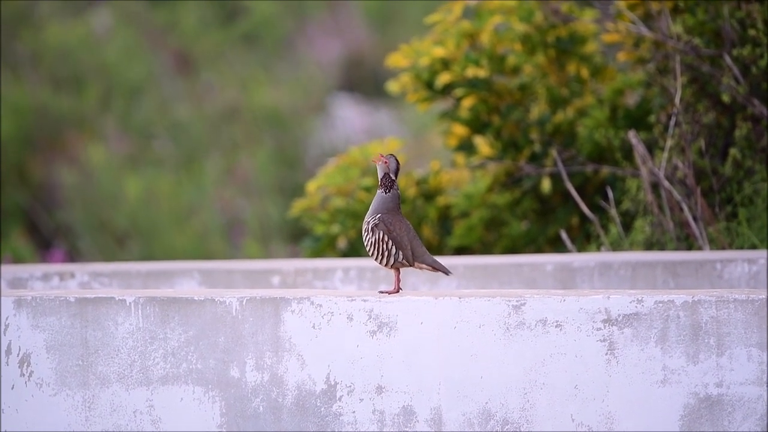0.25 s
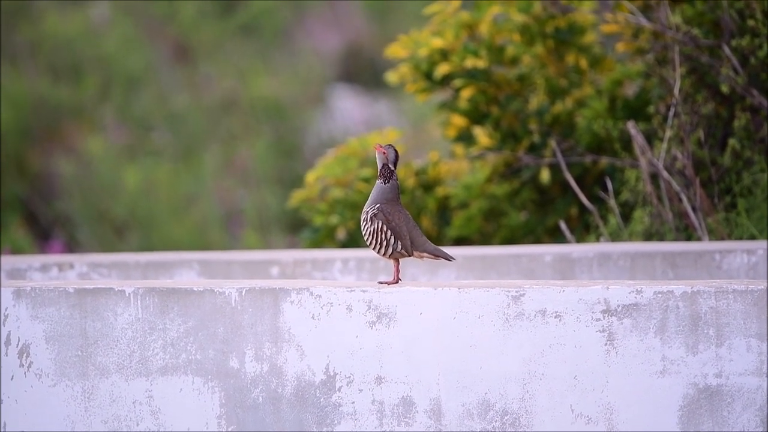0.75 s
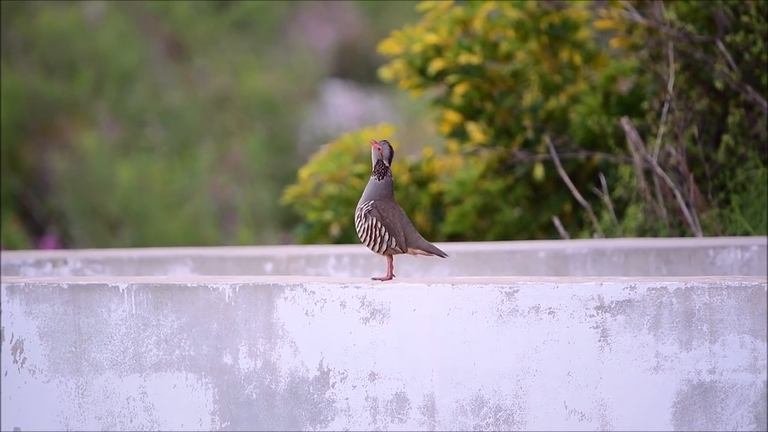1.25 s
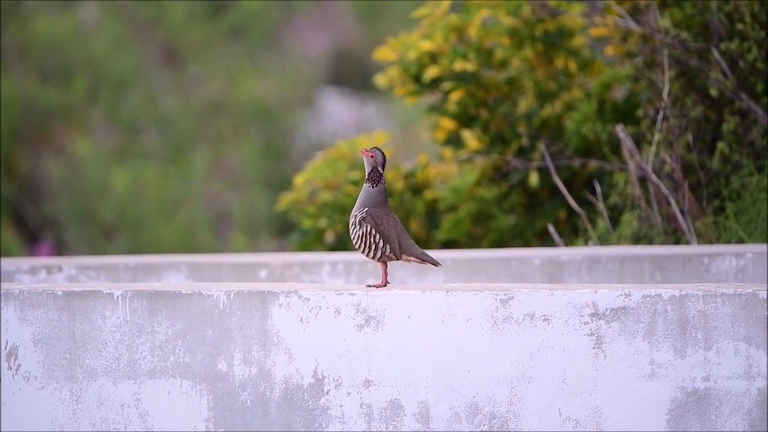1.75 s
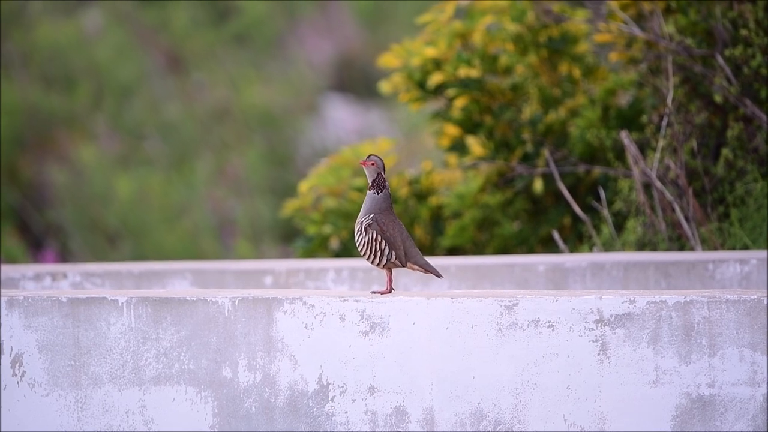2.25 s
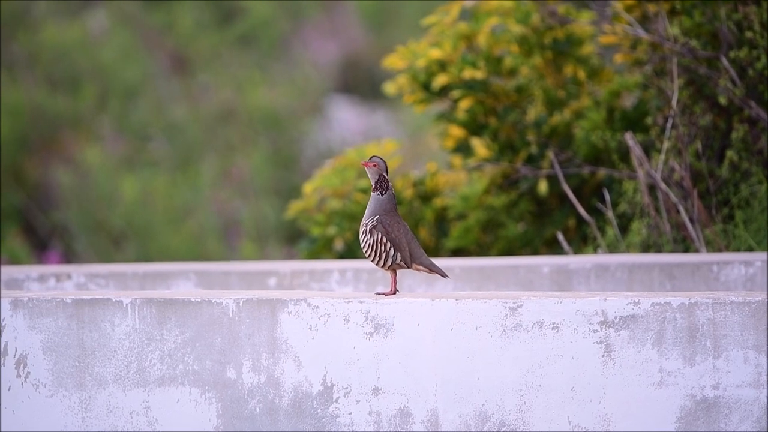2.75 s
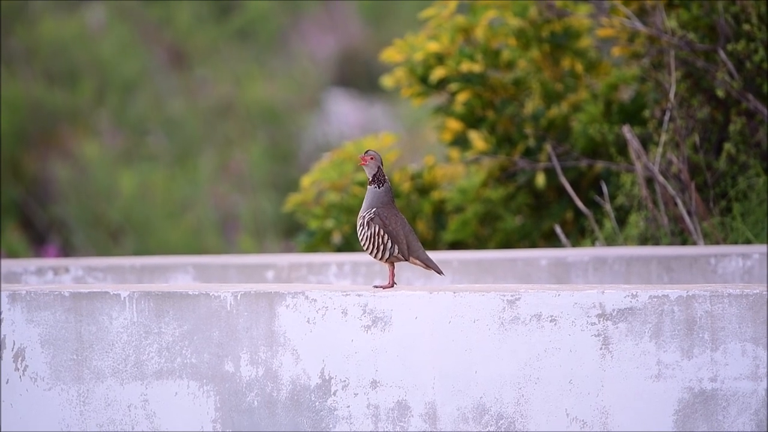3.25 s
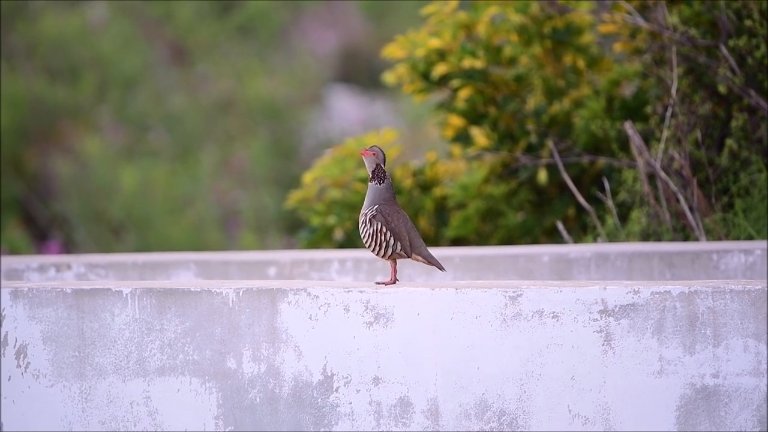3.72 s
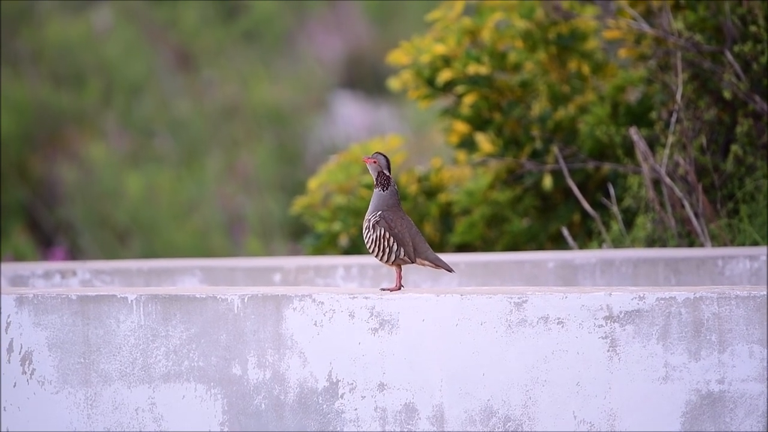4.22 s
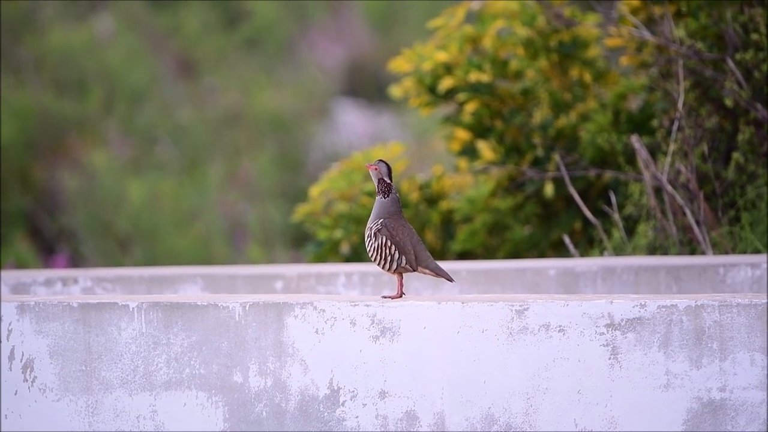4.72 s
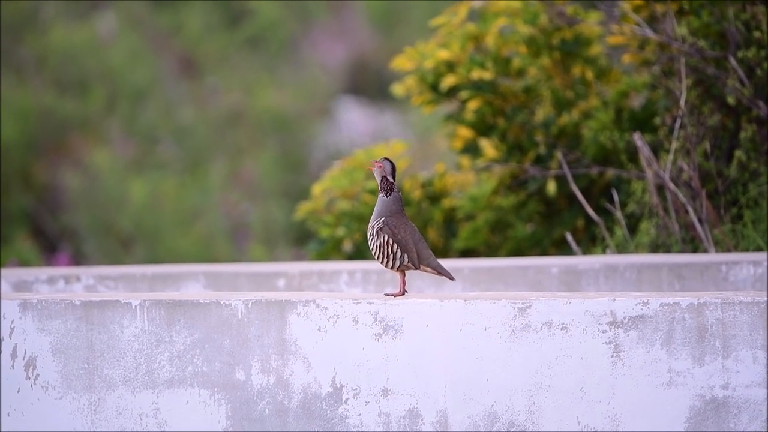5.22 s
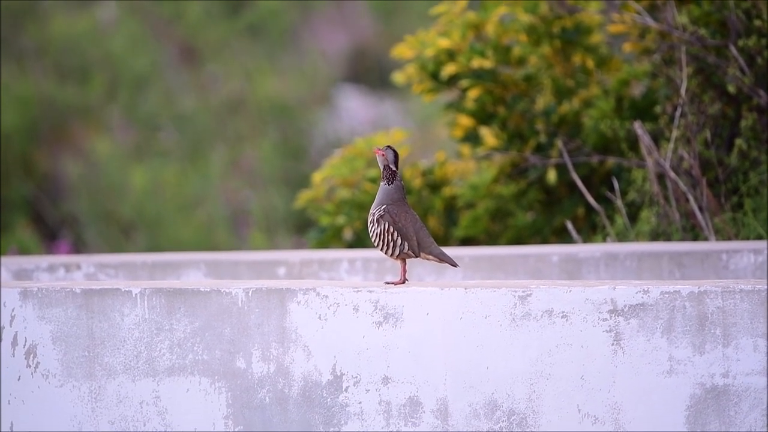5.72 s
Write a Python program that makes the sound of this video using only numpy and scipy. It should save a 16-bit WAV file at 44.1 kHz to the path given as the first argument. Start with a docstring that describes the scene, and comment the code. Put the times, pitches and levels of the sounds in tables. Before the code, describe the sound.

Pairs of high, raspy partridge calls repeat steadily on a hillside, with a low distant rumble and thin hum behind.

```python
"""Distant rumble, a camera's hum and its thin whine run throughout. A partridge's note echoes away
on a scrubby hillside and a harsh one follows. From 1 s the bird calls in pairs, squeaky then harsh:
each note opens with a croak, clears into an arched whistle, then breaks down into a rasping rattle.
Near 3.5 s the camera body knocks three times. The last pair gets a second harsh note at 5.3 s;
a final squeak comes at 5.9 s."""
import sys
import numpy as np
from scipy import signal
from scipy.fft import rfft, irfft, next_fast_len
from scipy.io import wavfile
from scipy.ndimage import map_coordinates

SR = 44100
rng = np.random.default_rng(int(sys.argv[2]) if len(sys.argv) > 2 else 0)


def materialize(psi):
    """Save the field psi as 16-bit PCM at rate SR to the path in sys.argv[1].

    A 1-D psi becomes a single channel; in a 2-D psi each row is a channel.
    """
    bounded = np.clip(np.atleast_2d(psi).T, -1, 1)
    quanta = np.round(bounded * 32767).astype(np.int16)
    wavfile.write(sys.argv[1], SR, quanta)


N = 263718


def amp(db):
    return 10 ** (np.asarray(db) / 20)


def unit(x):
    return x / np.sqrt(np.mean(x ** 2) + 1e-20)


def along(points, hz):
    """Interpolate (f/Hz, value) points over log frequency."""
    f, v = np.transpose(points)
    return np.interp(np.log(hz + 1), np.log(f), v)


def wobble(rate_hz, size):
    """Smooth random curve, rate_hz knots a second."""
    knots = rng.standard_normal(int(size * rate_hz / SR) + 4)
    return map_coordinates(knots, [np.arange(size) * rate_hz / SR])


def filtered(x, response):
    """Apply response(f/Hz) by FFT."""
    n = x.shape[-1]
    m = next_fast_len(n + 4096)
    return irfft(rfft(x, m) * response(np.fft.rfftfreq(m, 1 / SR)), m)[..., :n]


def resonance(f, hz, width_hz):
    """One damped mode."""
    return 1j * f * width_hz / (hz * hz - f * f + 1j * f * width_hz)


def step(t, rise_s):
    """Soft switch from 0 to 1 around t = 0."""
    return .5 + .5 * np.tanh(t / rise_s)


def add(track, sound, start_s):
    """Mix in a stereo sound."""
    i = round(start_s * SR)
    part = sound[:, max(-i, 0):N - i]
    track[:, max(i, 0):max(i, 0) + part.shape[1]] += part


def air():
    """Distant rumble, nearly mono, thinning to wide hiss in the treble."""
    # noise spectrum: f/Hz, relative density/dB
    spectrum = [(22, -16), (37, 1), (60, -3.5), (115, 0.5), (160, -2), (290, 0.5), (370, -6.5), (700, -3.5),
                (1100, -10.5), (1700, -16.5), (3000, -20.5), (6000, -28), (14000, -34.5), (16000, -20.5)]
    # left-right likeness: f/Hz, coherence
    coherence = [(50, 0.92), (150, 0.88), (400, 0.75), (1000, 0.41), (3000, 0.049), (12000, 0.062)]

    def mid_side(f):
        angle = np.arccos(np.clip(along(coherence, f), -1, 1)) / 2
        return amp(along(spectrum, f)) * [np.cos(angle), np.sin(angle)]

    mid, side = filtered(rng.standard_normal((2, N)), mid_side)
    return amp(-46 + .76 * wobble(2.206, N)) * unit(np.array([mid + side, mid - side]))


def hum():
    """The camera's mechanism hums through its body, mostly on the right, beside three steady tones."""
    # body modes: f/Hz, width/Hz, relative level/dB
    modes = [(288, 120, -24), (467.5, 13, -5.5), (689.7, 42, -3), (1068, 116, -8), (1329, 96, -3.5),
             (1456, 115, -4.5)]
    # steady tones: f/Hz, left/dB, right/dB
    tones = [(111.5, -60.5, -56.5), (886, -69, -69), (15635, -53, -59)]

    def body(f):
        power = sum(amp(2 * db) * abs(resonance(f, hz, width_hz)) ** 3 for hz, width_hz, db in modes)
        return np.sqrt(power / (1 + (f / 1560) ** 30))

    out = amp([[-64], [-43.5]]) * unit(filtered(rng.standard_normal(N), body))
    for hz, left_db, right_db in tones:
        phase = 2 * np.pi * np.cumsum(hz + 3 * wobble(25, N)) / SR
        out += np.sqrt(2) * amp([[left_db], [right_db]]) * np.sin(phase)
    return out


def knocks():
    """Small knocks ring the camera body's top mode; dry ticks go with them."""
    # body knocks: t/s, relative level/dB, t60/s
    hits = [(3.424, -29.5, 0.043), (3.4563, -21, 0.0082), (3.4922, -18, 0.023)]
    # dry ticks: t/s, level/dB
    ticks = [(3.425, -46), (3.4615, -46), (3.4812, -31)]
    out, t = np.zeros((2, N)), np.arange(SR // 16) / SR
    for start_s, db, t60_s in hits:
        ring = amp(db - 60 * t / t60_s) * (1 - np.exp(-t / .00074)) * np.sin(2 * np.pi * 1510 * t)
        add(out, ring * amp([[-10], [5]]), start_s)
    for start_s, db in ticks:
        noise = rng.standard_normal((2, len(t)))
        tick = filtered(noise, lambda f: resonance(f, 14000, 2200) - .6 * resonance(f, 5300, 1600))
        add(out, unit(tick) * amp(db - 60 * t / .008), start_s)
    return out


def hillside(voice):
    """Direct sound, quick scatter from ground and bushes, two far echoes and a diffuse tail."""
    # tail decay: f/Hz, t60/s
    decay = [(1000, 0.76), (2200, 0.94), (4200, 1.0), (6000, 0.88), (11000, 0.32)]
    hz, t, spectra = signal.stft(rng.standard_normal((3, SR)), SR, nperseg=256)
    tail = amp(-60 * t / along(decay, hz)[:, None]) * step(t - .03, .0071)
    scatter = amp(13.5 - 60 * t / .18) * step(t - .006, .017)
    left, right, shared = signal.istft(spectra * np.hypot(tail, scatter), SR, nperseg=256)[1]
    response = amp([[-.5], [1.5]]) * unit(np.array([left, right]) + .1 * shared) / np.sqrt(len(left))
    for delay_s, db in [(.076, -18.5), (.133, -23)]:
        response[:, round(delay_s * SR)] += amp(db)
    response[:, 0] += amp([-1.3, -.3])  # direct path
    return signal.fftconvolve(voice[None], response, axes=1)


def syrinx(hz, broken, rough):
    """Tone led by partial 2 at hz; roughness jolts pitch and level, breaking lifts the odd partials."""
    # syrinx partials: harmonic number, clear/dB, broken/dB
    partials = [(1, -38, -16), (2, 0, 0), (3, -38, -15), (4, -23, -24), (5, -50, -36)]
    n = len(hz)
    phase = np.pi * np.cumsum(hz * (1 + rough * wobble(1800, n))) / SR
    tone = sum(amp(clear_db + (broken_db - clear_db) * broken) * np.sin(k * phase)
               for k, clear_db, broken_db in partials)
    shimmer_db = np.minimum(45 * rough, 4) * wobble(710, n)
    return unit(tone * amp(shimmer_db))


def rasp(t, centre_hz, width_hz, peak_db, pulse_hz, jitter, hiss, bright_db):
    """Irregular slaps of the syrinx and turbulent air ring the throat."""
    # throat response: f/Hz, gain/dB
    colour = [(600, -49), (1200, -13), (1750, -5), (2600, -6.5), (3300, -3.5), (4100, -5.5), (5000, -3.5),
              (6000, -15), (8500, -25.5), (12000, -27), (15000, -68)]

    def throat(f):
        gain_db = along(colour, f) + bright_db * step(f - 6000, 1900)
        return amp(gain_db) * (1 + amp(peak_db) * resonance(f, centre_hz, width_hz))

    cycles = np.cumsum(pulse_hz * np.exp(jitter * wobble(700, len(t)))) / SR
    slaps = np.diff(np.floor(cycles), prepend=0) * amp(2 * rng.standard_normal(len(t)))
    puffs = rng.standard_normal(len(t)) * np.exp(-2 * (cycles % 1))
    return unit(filtered(unit(slaps) + hiss * unit(puffs), throat))


def croak(t, hz, hoarse):
    """Rising chirp over a buzz of slaps; hoarse notes are raspier, swell slower and last longer."""
    chirp = syrinx(hz * (1 - .24 * np.exp(-t / .008)), broken=.6, rough=.035 + .035 * hoarse)
    grit = rasp(t, hz, width_hz=900, peak_db=0, pulse_hz=1300,
                jitter=.08 + .12 * hoarse, hiss=.6, bright_db=-5)
    grit = unit(filtered(grit, lambda f: 1 / np.sqrt(1 + (f / hz) ** 4) + .037))
    swell = step(t - .003 - .003 * hoarse, .0025 + .003 * hoarse)
    fade = np.exp(-np.maximum(t - .010, 0) / (.009 + .02 * hoarse))
    return (amp(-3 - 2 * hoarse) * chirp + amp(-2 + hoarse) * grit) * swell * fade


def whistle(t, break_s, top_hz, hoarse, whistle_db, break_db):
    """The voice clears, arches and drops as the syrinx breaks; a hoarse one rasps underneath."""
    clear_s, broken_hz = .46 * break_s, 3300
    progress = np.clip((t - clear_s) / (break_s - clear_s), 0, 1)
    fall = 1 - np.exp(-np.maximum(t - break_s, 0) / .0045)
    scoop_hz = (400 + 500 * hoarse) * np.exp(-progress / .193)
    arch_hz = top_hz - scoop_hz - 250 * np.maximum(progress - .6, 0)
    rough = .005 + .025 * hoarse + .025 * fall
    tone = syrinx(arch_hz + (broken_hz - arch_hz) * fall, broken=.54 * fall, rough=rough)
    grit = rasp(t, top_hz, width_hz=730, peak_db=12, pulse_hz=991, jitter=.27, hiss=.9, bright_db=15)
    swell = amp(whistle_db - 10 * np.exp(-progress / .25))
    held = swell * step(t - clear_s, .002) * step(break_s - .001 - t, .002)
    burst = amp(break_db) * step(t - break_s - .0015, .001) * step(break_s + .008 - t, .002)
    return tone * (held + burst) + amp(-8) * hoarse * grit * held


def rattle(t, break_s, hz, hoarse):
    """The broken voice throbs on near the throat's resonance, over a buzz of slaps."""
    since_s = t - break_s
    length_s = .042 - .36 * break_s  # a later break leaves less air
    gate = step(since_s - .007, .0028) * step(length_s - since_s, .015)
    throb = np.cos(2 * np.pi * 112 * (since_s - .012))
    voiced = syrinx(hz * (1 + .03 * wobble(200, len(t))), broken=.8, rough=.05)
    grit = rasp(t, hz, width_hz=400, peak_db=1, pulse_hz=880,
                jitter=.13, hiss=.55, bright_db=4 * hoarse - 3)
    return (voiced * amp(-5 + 3.5 * throb) + grit * amp(-3 + 2 * throb)) * gate


def partridge():
    """Croak, whistle and rattle per note; effort strengthens all three, the whistle most."""
    # notes: t/s, break delay/s, whistle top/Hz, hoarseness 0-1, effort 0-1, level offset/dB
    notes = [(-.105, .053, 5194, .1, 0.64, -0.5), (.284, 0.042, 4437, .57, 0.98, 1),
             (.956, .056, 5185, 0.27, 0.76, -1.3), (1.357, .042, 3855, .9, .88, 0.66),
             (2.101, 0.062, 5176, .07, .03, 0.5), (2.533, .027, 4230, .63, .95, 0),
             (3.282, 0.06, 5170, .02, 0.09, 0.5), (3.71, .036, 4243, 0.31, 0.99, 1.1),
             (4.442, .060, 5150, .17, .1, 0.4), (4.861, 0.041, 4225, .42, 1, -0.2),
             (5.267, 0.043, 4270, .63, 0.93, -0.5), (5.9, 0.06, 5140, .3, 0.19, 0)]
    out, t = np.zeros((2, N)), np.arange(SR // 8) / SR
    for start_s, break_s, top_hz, hoarse, effort, offset_db in notes:
        croak_db, croak_hz = -37 + 6.5 * effort, 3086 + 499.4 * effort + 704.5 * hoarse
        whistle_db, break_db = -42.5 + 18.5 * effort, -28.5 + 4 * effort - 3.5 * hoarse
        rattle_db, rattle_hz = -29.5 + 4.5 * effort, 4083 + 150.4 * effort
        voice = amp(croak_db) * croak(t, croak_hz, hoarse)
        voice += whistle(t, break_s, top_hz, hoarse, whistle_db, break_db)
        voice += amp(rattle_db) * rattle(t, break_s, rattle_hz, hoarse)
        add(out, hillside(amp(offset_db) * voice), start_s)
    return out


def scene():
    return partridge() + air() + hum() + knocks()


def record(dry):
    """Brick-wall low-pass."""
    return filtered(dry, lambda hz: hz < 15900)


dry = scene()
out = record(dry)
materialize(out)
```